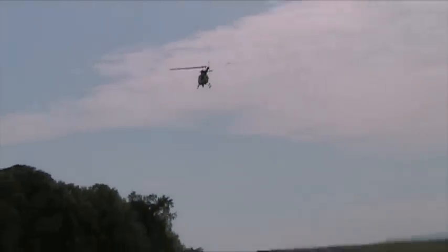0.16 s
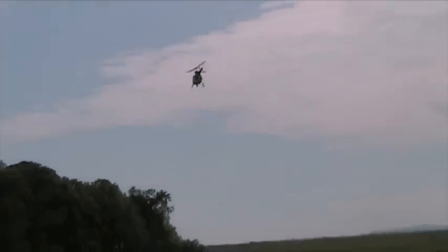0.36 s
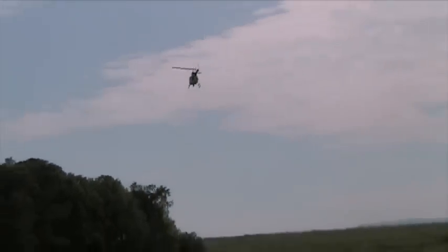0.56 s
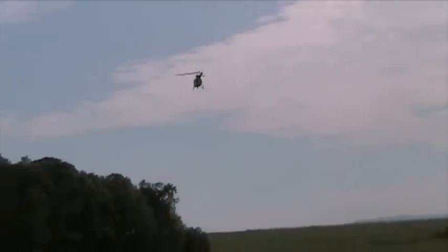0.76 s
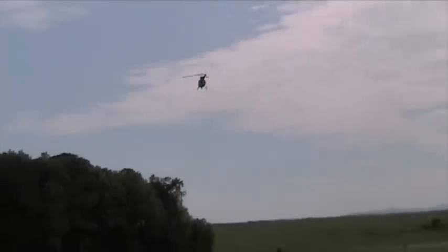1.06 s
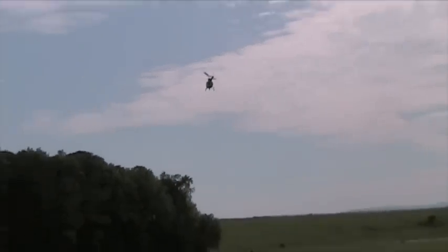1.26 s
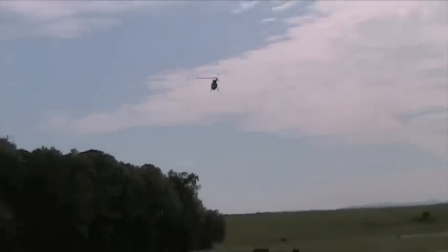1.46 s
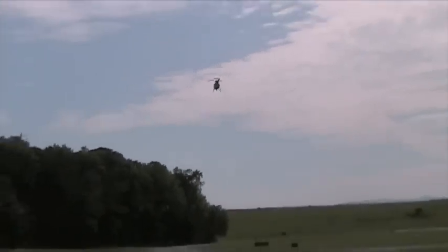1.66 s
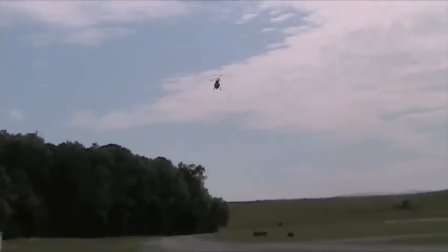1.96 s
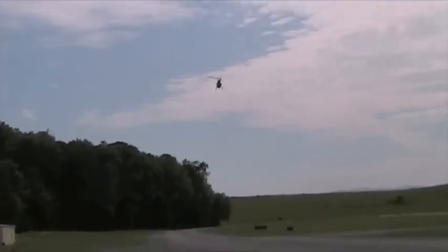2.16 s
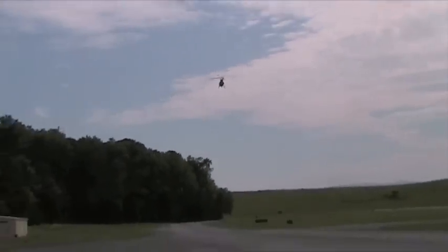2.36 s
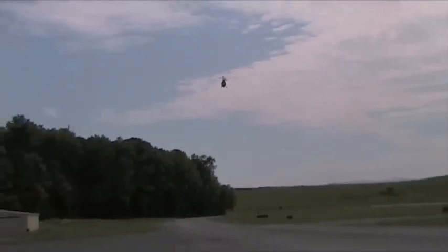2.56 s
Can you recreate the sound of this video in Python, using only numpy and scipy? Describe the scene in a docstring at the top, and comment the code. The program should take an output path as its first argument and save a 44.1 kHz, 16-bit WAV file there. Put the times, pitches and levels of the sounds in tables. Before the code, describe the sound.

A small helicopter recedes over an open field: a steady low tail rotor buzz, rapid irregular slaps and knocks about twelve times a second, and roaring churned air, heard from the ground by a small stereo camera microphone.

```python
"""A small helicopter flies away over a field: a tail rotor buzz and slaps amid a roar of churned air.
The buzz is a train of tail blade pulses; slaps come where a tail blade meets a main blade's vortex.
The main blades swish, rasp and crack: noise with a gain at the main blade rate or in listed bursts.
Behind them are a scattered return, a brief whistle, the camera's thin whine and microphone hiss.
Growing air loss dulls the rotors; a left/right filter places them between two microphones."""
import sys
import numpy as np
from scipy import signal
from scipy.fft import rfft, irfft, next_fast_len
from scipy.io import wavfile
from scipy.ndimage import uniform_filter1d, map_coordinates

SR = 44100
rng = np.random.default_rng(int(sys.argv[2]) if len(sys.argv) > 2 else 0)


def unload_audio(sound):
    """Save the sound as a 16-bit wav file, at the path given as the first command line argument."""
    columns = np.transpose(np.atleast_2d(sound))
    # keep every value between -1 and 1, then stretch to whole-number steps
    steps = np.round(np.clip(columns, -1, 1) * 32767)
    wavfile.write(sys.argv[1], SR, steps.astype(np.int16))


N = 120393

# blade passing rates and reference passes
TAIL_HZ, TAIL_START_S = 79.78, 0.0072
MAIN_HZ, MAIN_START_S = 12.276, 0.0588
# vortex cores cut by a tail blade: (time [s], knock peak before trim [dB], edge peak before trim [dB])
CORE_CUTS = [(.0433, -14, -37), (0.0571, -8.5, -32), (0.1323, -9, -38.5), (0.1467, -23, -34),
             (0.1596, -14.5, -37), (0.2062, -11.5, -38), (0.2209, -10.5, -22.5), (0.247, -21.5, -42),
             (0.2798, -22, -31.5), (0.2945, -11, -35.5), (.309, -12.5, -32.5), (.3834, -12, -28.5),
             (0.3956, -18, -34), (0.4575, -12, -30.5), (.4719, -19.5, -37), (0.547, -9.5, -26.5),
             (0.5604, -18.5, -30), (0.5726, -15, -26), (.6211, -9.5, -30.5), (0.6344, -16.5, -34),
             (0.7093, -12, -25.5), (0.7225, -21, -35), (0.7852, -16.5, -36), (0.8006, -18, -38),
             (0.873, -15, -36.5), (0.946, -13, -31), (1.021, -17, -34), (1.0344, -13, -29.5),
             (1.0494, -13.5, -33), (1.11, -14, -31), (1.1793, -14, -35), (1.1989, -20, -26),
             (1.2123, -18, -35), (1.2727, -18, -32.5), (1.3751, -20.5, -41.5), (1.4358, -17.5, -36.5),
             (1.4522, -18.5, -32.5), (1.5988, -17.5, -32.5), (1.613, -20.5, -37), (1.6298, -18, -29),
             (1.674, -19.5, -46), (1.7007, -13.5, -33), (1.7604, -15, -37), (1.7751, -15, -38),
             (1.839, -19.5, -44), (1.926, -14, -37), (1.9989, -16, -42), (2.0881, -19.5, -32),
             (2.1614, -15.5, -34.5), (2.176, -19, -43), (2.2502, -12.5, -25.5), (2.4121, -14, -27),
             (2.4879, -15.5, -40), (2.5772, -16.5, -33.5), (2.6502, -21, -38.5), (2.683, -19, -41)]


def amp(db):
    """Decibels to gain."""
    return 10 ** (np.asarray(db) / 20)


def unit(x):
    """Scale to rms 1."""
    return x / np.sqrt(np.mean(x ** 2) + 1e-20)


def clock():
    """Time of each sample [s]."""
    return np.arange(N) / SR


def along(points, hz):
    """Interpolate (frequency [Hz], value) points on a log frequency axis."""
    point_hz, values = np.transpose(points)
    return np.interp(np.log(hz + 1), np.log(point_hz + 1), values)


def track(points):
    """Gain curve through (time [s], level [dB]) points, linear in dB."""
    s, db = np.transpose(points)
    return amp(np.interp(clock(), s, db))


def wobble(knots_per_s):
    """Smooth random curve through normally distributed knots."""
    knots = rng.standard_normal(int(N * knots_per_s / SR) + 4)
    return map_coordinates(knots, [clock() * knots_per_s])


def filtered(x, response):
    """Filter x by a complex response of frequency, zero-padded against wrap-around."""
    size = 2 * next_fast_len(N)
    hz = np.fft.rfftfreq(size, 1 / SR)
    return irfft(rfft(x, size) * response(hz), size)[..., :N]


def noise(spectrum):
    """Gaussian noise of the given colour, rms 1."""
    return unit(filtered(rng.standard_normal(N), lambda hz: amp(along(spectrum, hz))))


def pulses(times_s, peaks, spectrum, size=4096):
    """Train of minimum-phase pressure pulses of the given colour and peaks."""
    log_gain = np.log(amp(along(spectrum, np.fft.rfftfreq(size, 1 / SR))))
    # fold the cepstrum to make the pulse causal
    cepstrum = irfft(log_gain)
    cepstrum[1:size // 2] *= 2
    cepstrum[size // 2 + 1:] = 0
    shape = irfft(np.exp(rfft(cepstrum)))
    shape = shape / np.abs(shape).max()
    # late pulses land in a spare last slot, which is cut off
    slots = np.clip(np.round(times_s * SR).astype(int), 0, N)
    train = np.bincount(slots, peaks, N + 1)[:N]
    return signal.fftconvolve(train, shape)[:N]


def throb(rate_hz, start_s, depth_db):
    """Gain of rms 1 that swells once a blade pass, by +/- depth_db."""
    return unit(amp(depth_db * np.cos(2 * np.pi * rate_hz * (clock() - start_s))))


def steady(x, span_s):
    """Even out the slow swells of x: divide by its running rms."""
    power = np.abs(uniform_filter1d(x ** 2, int(span_s * SR)))
    return unit(x / np.sqrt(power + 1e-9))


def tail_blades():
    """Times at which a tail blade passes [s]."""
    return np.arange(TAIL_START_S, N / SR, 1 / TAIL_HZ)


def buzz(lead_s=0.00024, rough=0.026, waver_db=0.14):
    """Each tail blade sends one low pulse; its colour crossfades from near to far behind."""
    # pulse colours: (frequency [Hz], relative level [dB])
    near_colour = [(30, -48.5), (80, -15.5), (160, 1), (240, 0), (320, -8.5), (400, -14), (480, -10.5),
                   (560, -11.5), (720, -18.5), (1500, -39), (4000, -84)]
    far_colour = [(30, -47.5), (80, -17), (160, -3), (240, 3), (320, -6.5), (400, -12.5), (480, -10.5),
                  (560, -17), (720, -27), (1500, -37), (4000, -85)]
    # crossfade: (start [s], end [s])
    turn_s = (0.64, 2.25)
    s = tail_blades()
    peaks = 1 + rough * rng.standard_normal(len(s))
    near = unit(pulses(s - lead_s, peaks, near_colour))
    far = unit(pulses(s - lead_s, peaks, far_colour))
    farness = np.interp(clock(), turn_s, [0, 1])
    return (near + (far - near) * farness) * amp(waver_db * wobble(7.56))


def slaps(lead_s=0.0001, jitter_s=0.00027):
    """Near misses: a tail blade slaps harder the closer it passes to a main blade's vortex."""
    # (frequency [Hz], relative level [dB])
    slap_colour = [(100, -28.5), (350, -8), (600, 7), (830, -1.5), (1100, 14), (1550, -0.5), (1850, -17.5),
                   (3000, -25.5), (6000, -41), (12000, -74)]
    vortex_lead_s, rise_s, fall_s = 0.0039, 0.0085, 0.023
    level_db, growth_db_per_s, scatter_db = -18, 0.64, 0.5
    s = tail_blades()
    # time from the nearest vortex, negative before it
    cycles = (s - MAIN_START_S + vortex_lead_s) * MAIN_HZ
    miss_s = ((cycles + 0.5) % 1 - 0.5) / MAIN_HZ
    closeness = np.exp(np.where(miss_s < 0, -(miss_s / rise_s) ** 2, -miss_s / fall_s))
    # passes that cut a core belong to hard_slaps
    core_s = np.transpose(CORE_CUTS)[0]
    misses_core = np.abs(s[:, None] - core_s).min(axis=1) > 0.5 / TAIL_HZ
    spread, jitter = rng.standard_normal((len(s), 2)).T
    peaks = misses_core * closeness * amp(level_db + growth_db_per_s * s + scatter_db * spread)
    return pulses(s - lead_s + jitter_s * jitter, peaks, slap_colour)


def hard_slaps(delay_s=-0.00019, knock_trim_db=0.5, edge_trim_db=-1):
    """A tail blade cuts right through a vortex core: a sharp-edged knock, repeated at once by the ground."""
    # knock and edge colours: (frequency [Hz], relative level [dB])
    knock_colour = [(100, -27.5), (400, -9), (700, -1), (1100, 3.5), (1500, 0.5), (1900, -22.5),
                    (3000, -22), (6000, -46), (12000, -86.5)]
    edge_colour = [(500, -29), (1500, -5), (2300, -4), (3200, -3.5), (5000, -9.5), (8000, -35.5),
                   (12000, -70)]
    ground_s, ground_db, ground_lowpass_hz = 0.00168, -7.5, 1490
    s, knock_db, edge_db = np.transpose(CORE_CUTS)
    s = s + delay_s
    knocks = pulses(s, amp(knock_db + knock_trim_db), knock_colour)
    edges = pulses(s, amp(edge_db + edge_trim_db), edge_colour)

    def with_ground(hz):
        """Direct sound plus one delayed, dulled bounce."""
        bounce = amp(ground_db) * np.exp(-2j * np.pi * hz * ground_s)
        return 1 + bounce / (1 + 1j * hz / ground_lowpass_hz)

    return filtered(knocks + edges, with_ground)


def roar():
    """Low, even turbulence, pumped gently by the tail blades."""
    # (frequency [Hz], relative level [dB])
    roar_colour = [(20, -54.5), (50, -25), (80, -20), (110, -16), (150, -4.5), (200, -3), (275, -0.5),
                   (320, -9), (370, -19.5), (600, -23), (2000, -88)]
    return steady(noise(roar_colour), span_s=0.091) * throb(TAIL_HZ, TAIL_START_S + 0.00064, depth_db=0.2)


def chop():
    """Rougher air noise, swelling slightly at the main blade rate."""
    # (frequency [Hz], relative level [dB])
    chop_colour = [(200, -33.5), (380, -6.5), (520, 2), (680, -0.5), (830, -7.5), (1100, -5), (1500, -12),
                   (1850, -18), (2300, -18), (4000, -64)]
    return noise(chop_colour) * throb(MAIN_HZ, MAIN_START_S, depth_db=0.26)


def wake(lead_s=0.015, rise_s=0.0049, fall_s=0.034):
    """Each main blade leaves rough air, which the tail blades shred into a short rasp."""
    # (frequency [Hz], relative level [dB])
    wake_colour = [(300, -22.5), (600, 0.5), (830, -1), (1100, 3), (1500, 0), (1850, -18.5), (2400, -11),
                   (3500, -22), (6000, -26), (10000, -65)]
    age_s = (clock() - MAIN_START_S + lead_s) % (1 / MAIN_HZ)
    gust = unit((1 - np.exp(-age_s / rise_s)) * np.exp(-age_s / fall_s))
    return noise(wake_colour) * gust * throb(TAIL_HZ, TAIL_START_S + 0.00041, depth_db=5)


def swish(lag_s=0.018):
    """Bright air noise that swells once a main blade pass."""
    # (frequency [Hz], relative level [dB])
    swish_colour = [(500, -3), (1200, -2.5), (1850, -2), (2300, -1.5), (3200, -3.5), (4000, -8.5),
                    (5100, -8), (6000, -16), (8000, -20.5), (9500, -29), (10500, -50.5), (15000, -64.5)]
    return noise(swish_colour) * throb(MAIN_HZ, MAIN_START_S + lag_s, depth_db=1.63)


def cracks(trim_db=-1, rise_s=0.0002, t60_s=0.033):
    """Short bright noise bursts where a blade hits rough air."""
    # (time [s], level before trim [dB]); all bursts share one rise and decay
    bursts = [(0.059, -31.5), (0.087, -28.5), (0.1634, -29), (0.218, -32.5), (0.2398, -28.5), (0.3152, -30),
              (0.382, -24.5), (0.399, -31), (0.473, -29.5), (0.486, -35.5), (0.545, -27), (0.7094, -27.5),
              (0.7996, -29.5), (0.875, -37.5), (1.035, -29.5), (1.2023, -24.5), (1.2904, -37.5),
              (1.3632, -30), (1.4407, -28.5), (1.453, -38.5), (1.6068, -27.5), (1.628, -31.5),
              (1.6888, -30.5), (1.762, -28.5), (1.776, -26.5), (1.8655, -31.5), (1.927, -27.5),
              (1.954, -32), (2.0853, -30.5), (2.2506, -27.5), (2.4135, -26.5), (2.578, -27.5)]
    # (frequency [Hz], relative level [dB])
    crack_colour = [(800, -9), (2000, 2.5), (2800, -1), (4000, -8.5), (5200, -11), (8000, -27.5),
                    (10000, -50), (15000, -69.5)]
    envelope = np.zeros(N)
    for s, db in bursts:
        age_s = np.maximum(clock() - s, 0)
        decay = amp(db + trim_db - 60 * age_s / t60_s)
        envelope += decay * (1 - np.exp(-age_s / rise_s))
    return envelope * noise(crack_colour)


def receding(x, loss_db_per_s=5, loss_hz=7500):
    """Air takes more treble with distance: crossfade to a loss that grows as frequency squared."""
    end_loss_db = loss_db_per_s * N / SR  # at loss_hz
    far = filtered(x, lambda hz: amp(-end_loss_db * (hz / loss_hz) ** 2))
    return x + (far - x) * np.linspace(0, 1, N)


def whistle():
    """Brief faint sine that mostly sinks in pitch."""
    # (time [s], frequency [Hz], level [dB])
    glide = [(.55, 3416, -70), (.59, 3430, -46), (.65, 3390, -55), (.69, 3300, -47), (.76, 3200, -74)]
    s, hz, db = np.transpose(glide)
    envelope = np.interp(clock(), s, amp(db), left=0, right=0)
    phase = 2 * np.pi * np.cumsum(np.interp(clock(), s, hz)) / SR
    return envelope * np.sin(phase)


def stereo(x):
    """Two-microphone image: level and phase offsets by frequency, split evenly between the sides."""
    # (frequency [Hz], left minus right [dB])
    pan = [(30, -0.5), (45, 0.5), (85, 7.5), (130, 0.5), (200, 0), (400, -2.5), (720, 0), (900, -2.4),
           (1400, 0.5), (3000, -0.5)]
    # (frequency [Hz], phase by which left leads [rad])
    lead = [(30, -1), (90, -.9), (150, -0.64), (300, -0.37), (420, 0.11), (780, 0), (950, 0.099),
            (1350, 0.39), (1700, .08), (3000, 0.043), (4000, 0.56)]
    sides = np.array([[0.5], [-0.5]])
    return filtered(x, lambda hz: amp(sides * along(pan, hz)) * np.exp(1j * sides * along(lead, hz)))


def scatter(level_db=-41):
    """Diffuse noise scattered by trees and field, opposite in polarity left and right."""
    # (frequency [Hz], relative level [dB])
    scatter_colour = [(30, -17.5), (100, -15.5), (160, -6), (250, -1), (320, 2), (400, -10), (700, -8.5),
                      (1200, -11), (1600, -28.5), (2200, -25.5), (3000, -39), (4000, -37.5), (5200, -32),
                      (6000, -47), (12000, -48)]
    return np.array([[1], [-1]]) * amp(level_db) * noise(scatter_colour)


def whine(flutter_db=2.5):
    """Thin sines from inside the camera, fixed in pitch and fluttering in level."""
    # (frequency [Hz], peak level before flutter [dB])
    tones = [(4694, -60.5), (5094, -66.5), (5394, -71.5), (6294, -70), (9292, -85.5)]
    total = np.zeros(N)
    for hz, db in tones:
        total += amp(db + flutter_db * wobble(9.5)) * np.sin(2 * np.pi * hz * clock())
    return total


def hiss(level_db=-65.5, side_db=4.5):
    """Faint noise of the two microphones, as independent mid and side parts."""
    # (frequency [Hz], relative level [dB])
    hiss_colour = [(30, 4.5), (300, 2.5), (5000, -7), (9300, -1.5), (10300, -8), (15000, -27.5)]
    mid = noise(hiss_colour)
    side = amp(side_db) * noise(hiss_colour)
    return amp(level_db) * np.array([mid + side, mid - side])


def scene():
    """The helicopter ahead of a close pair of microphones."""
    # air levels before trims: (time [s], bass [dB], middle [dB], treble [dB])
    air_levels = [(0, -18, -24, -39.5), (.4, -15.5, -23, -39.5), (1.0, -16.5, -22.5, -40.5),
                  (1.6, -14.5, -23, -40), (1.9, -16.5, -24.5, -41), (2.25, -16.5, -24.5, -41.5),
                  (2.72, -19, -26, -41.5)]
    # (time [s], level [dB])
    buzz_level = [(0, -18.5), (.4, -18.5), (1.1, -17), (1.55, -20.5), (2.05, -17.5), (2.45, -20),
                  (2.72, -22)]
    s, *columns_db = np.transpose(air_levels)
    bass, middle, treble = [amp(np.interp(clock(), s, db)) for db in columns_db]
    tail = track(buzz_level) * buzz()
    air = bass * amp(-3) * roar()
    air += middle * (amp(-2.5) * chop() + amp(-12) * wake())
    air += treble * amp(0.5) * swish()
    rotors = receding(tail + air + slaps() + hard_slaps() + cracks())
    # the scatter follows the middle level
    background = unit(middle) * scatter() + whine() + hiss()
    return stereo(rotors + whistle()) + background


def record(dry):
    """The camera keeps nothing from 15.2 kHz up."""
    return filtered(dry, lambda hz: hz < 15200)


dry = scene()
out = record(dry)
unload_audio(out)
```